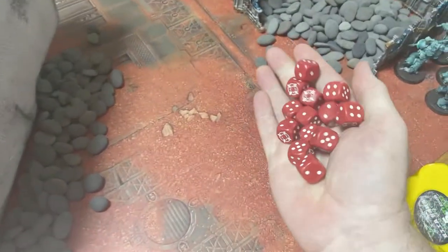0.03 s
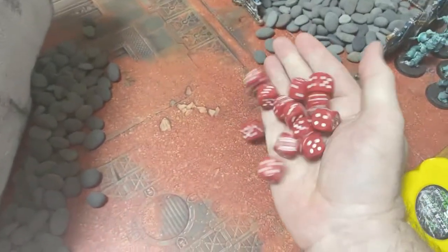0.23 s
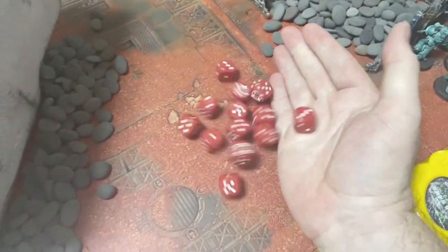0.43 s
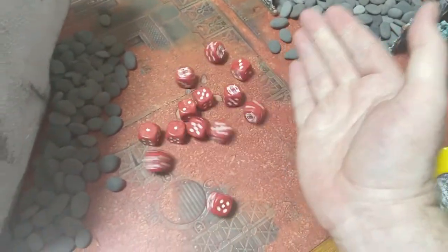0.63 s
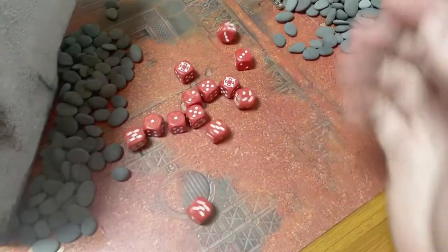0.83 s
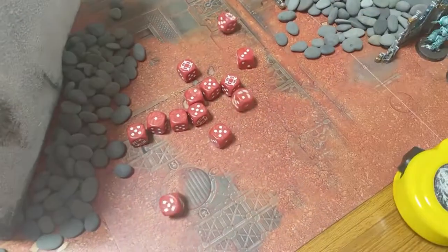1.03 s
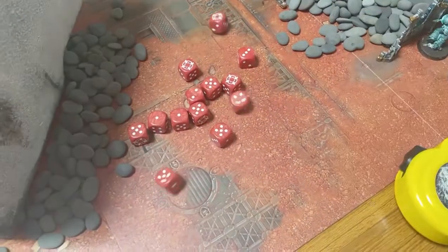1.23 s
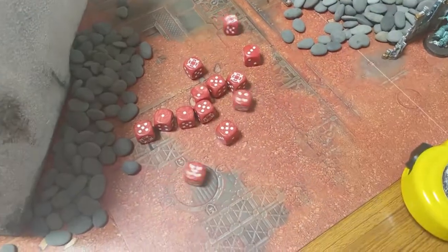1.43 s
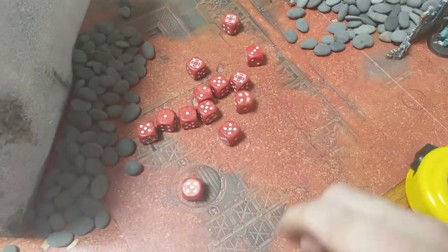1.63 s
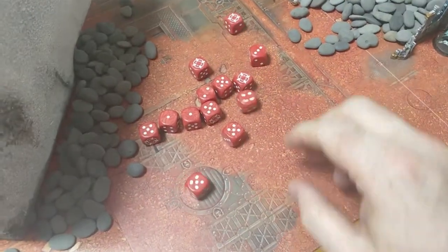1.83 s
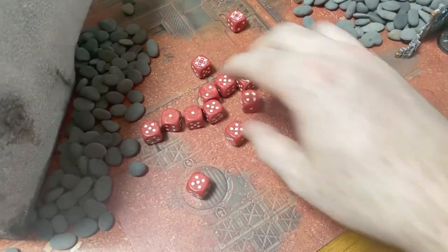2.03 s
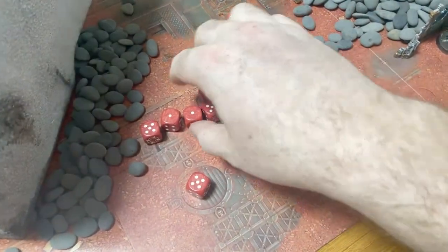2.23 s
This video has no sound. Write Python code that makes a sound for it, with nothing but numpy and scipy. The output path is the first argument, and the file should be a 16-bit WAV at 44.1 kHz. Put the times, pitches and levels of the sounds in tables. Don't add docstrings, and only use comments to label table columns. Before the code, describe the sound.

Dice thrown from a hand crack together and knock a wooden table, thinning quickly to faint clicks, soft taps and finger nudges, over quiet hiss, thin whine and a far cricket in a small room.

```python
import sys
import numpy as np
from scipy import signal
from scipy.fft import rfft, irfft
from scipy.io import wavfile
from scipy.ndimage import uniform_filter1d, minimum_filter1d

SR = 44100
rng = np.random.default_rng(int(sys.argv[2]) if len(sys.argv) > 2 else 0)


def level_to_linear(level):
    exponent = np.asarray(level, float) / 20
    return 10 ** exponent


def file_out(sig):
    cols = np.atleast_2d(sig).T
    lim = np.clip(cols, -1, 1)
    pcm = np.round(lim * 32767).astype(np.int16)
    wavfile.write(sys.argv[1], SR, pcm)


N = 101429
CONTACT_S = 0.0007


def unit(x):
    return x / np.sqrt(np.mean(x ** 2) + 1e-30)


def colour(x, table):
    f = np.maximum(np.fft.rfftfreq(len(x), 1 / SR), 1)
    points = np.array(table, float)
    gain_db = np.interp(np.log(f), np.log(points[:, 0]), points[:, 1], right=-70)
    return irfft(rfft(x) * level_to_linear(gain_db), len(x))


def above(x, hz):
    return signal.sosfilt(signal.butter(3, hz, "high", fs=SR, output="sos"), x)


def fade(t60, rise, size=3000):
    t = np.arange(size) / SR
    return t, (1 - np.exp(-t / rise)) ** 2 * np.exp(-t * np.log(1000) / t60)


def burst(table, t60, rise, hz=None):
    t, envelope = fade(t60, rise)
    if hz:
        table = [(f, db - abs(np.log2(f / hz))) for f, db in table]
    x = colour(rng.standard_normal(len(t)), table) * envelope
    return x / np.abs(x).max()


def hits(rows, db, t60, rise, table, body_db, body_t60):
    out = np.zeros(N + 4000)
    t, envelope = fade(t60, rise)
    for s, peak, hz in rows:
        partner_hz = hz * (0.7955 + 0.362 * rng.random())
        pair = np.sin(2 * np.pi * hz * t) + 0.5 * np.sin(2 * np.pi * partner_hz * t)
        ring = envelope * pair
        x = ring / np.abs(ring).max() + level_to_linear(body_db) * burst(table, body_t60, rise, hz)
        i = int((s + CONTACT_S) * SR)
        out[i:i + len(t)] += level_to_linear(peak + db) * x / np.abs(x).max()
    return out[:N]


def swarm(curve, db, rate, scatter_db, table, t60, rise):
    t, points, out = np.arange(N) / SR, np.array(curve), 0
    for _ in range(6):
        struck = rng.random(N) < rate / 6 / SR
        kicks = struck * level_to_linear(scatter_db * np.minimum(rng.exponential(size=N), 3))
        out = out + signal.fftconvolve(kicks, burst(table, t60, rise))[:N]
    return unit(out) * level_to_linear(np.interp(t, points[:, 0], points[:, 1], left=-120) + db)


# [f/Hz, level/dB]
HISS_COLOUR = [(30, 3), (250, -4.5), (400, -12), (2400, -18), (3700, -22), (4400, -4.5), (5700, -1.5),
               (10500, -34)]


def hiss():
    f, w = 13540, 2400
    bump = [(f - 2 * w, -14), (f - w, -8), (f, 0), (f + w / 2, -7), (f + .62 * w, -60)]
    top = colour(rng.standard_normal(N), bump)
    broad = colour(rng.standard_normal(N), HISS_COLOUR)
    settle = level_to_linear(2.2 * (np.arange(N) / SR < .1))
    return settle * (level_to_linear(-56.5) * unit(broad) + level_to_linear(-66.5) * unit(top))


# [f/Hz, width/Hz, level/dB]
WHINE_LINES = [(4350, 52, -67.5), (5130, 24, -65)]


def whine():
    out = np.zeros(N)
    for hz, w, db in WHINE_LINES:
        line = [(hz - 3 * w, -50), (hz - w, -12), (hz, 0), (hz + w, -12), (hz + 3 * w, -50)]
        out += level_to_linear(db) * unit(colour(rng.standard_normal(N), line))
    return out


def cricket():
    first_s, chirp_s, loudest_s, note_hz = 0.058, 0.0755, 1.15, 5605
    t = np.arange(N) / SR
    k = (t - first_s) / chirp_s + 1
    chirp_size = level_to_linear(2 * rng.standard_normal(64))[np.floor(k + .5).astype(int)]
    swell = level_to_linear(-10 * np.minimum(abs(t - loudest_s), .6))
    throb = np.maximum(np.cos(2 * np.pi * k), 0)
    return level_to_linear(-55.5) * chirp_size * swell * throb * np.sin(2 * np.pi * note_hz * t)


# [t/s, level/dB, f/Hz]
PALM_CLICKS = [
    (0.0928, -30, 4930),
    (0.0997, -10, 7050),
    (0.1084, -23, 4800),
    (0.117, -20.5, 5000),
    (0.1197, -37, 4500),
    (0.129, -22, 4550),
    (0.1457, -17, 5000),
    (0.1591, -19.5, 4600),
    (0.1855, -18.5, 4040),
    (0.2066, -10, 5900),
]
# [t/s, level/dB, f/Hz]
TABLE_CLICKS = [(0.239, -8, 4410), (0.26, -19, 4430), (0.2699, 3, 4400), (0.2855, -14, 6840),
                (0.3159, 1, 4430), (0.3221, -4.5, 6250), (0.34, -22, 5170), (0.351, -13, 5690),
                (0.3602, -9, 4800), (0.402, -8, 4930), (0.411, -7, 4350), (0.4315, -4, 7100),
                (0.4657, -11, 4300), (0.5043, -12.5, 6460), (0.5283, -25, 6700), (0.5511, -8, 6100),
                (0.596, -11, 6600), (0.6095, -19, 6100), (0.6268, -11.5, 5660), (0.6473, -16.5, 5740),
                (0.6692, -17.5, 8400), (0.6851, -16, 8500), (0.6923, -14, 5600), (0.6995, -21, 6100)]
# [t/s, level/dB, f/Hz]
TICKS = [(0.291, -40, 4550), (0.304, -19, 4540), (0.3283, -18, 6400), (0.348, -13, 6800),
         (0.3754, -24, 4200), (0.423, -31, 6540), (0.4514, -31, 4410), (0.4612, -20, 6500),
         (0.4873, -22, 5590), (0.5177, -21, 6600), (0.5353, -24, 6250), (0.5694, -32, 5240),
         (0.6161, -22.5, 6750), (0.715, -30, 5950)]
# [t/s, level/dB, f/Hz]
LATE_CLICKS = [
    (0.8074, -33, 5940),
    (0.829, -25, 4550),
    (0.9173, -26, 5000),
    (1.3134, -26, 4900),
    (1.479, -33.5, 4350),
    (1.5378, -35.5, 5400),
    (1.5926, -33, 5160),
    (1.6842, -35, 4830),
    (1.724, -29, 5270),
    (1.7948, -33.5, 4600),
]
# [t/s, level/dB]
CHATTER = [(.098, -86), (.2, -43.5), (.24, -35.5), (.36, -29.5), (.55, -36.5), (.71, -38.5), (.76, -45),
           (.95, -55.5)]
# [f/Hz, level/dB]
CUPPED = [(1000, -13), (2500, -4.5), (4700, 4), (8500, -6.5), (11000, -22), (14000, -36), (16000, -43)]
# [f/Hz, level/dB]
DIE = [(1200, -6), (2500, -2), (3700, -23.5), (4600, -9), (7000, -13.5), (11000, -26), (13700, -15.5),
       (16000, -45)]
# [f/Hz, level/dB]
BLUR = [(1200, -4), (2500, -1), (3700, -13.5), (4600, -5), (7000, -5.5), (11000, -19), (13700, -20),
        (16000, -32)]


def dice():
    curve = list(CHATTER) + [(1.02, -80)]
    held = np.arange(N) / SR < .215
    palm = hits(PALM_CLICKS, 0.62, t60=0.0045, rise=0.0001, table=CUPPED, body_db=3.2, body_t60=0.0035)
    late = hits(LATE_CLICKS, -2.7, t60=0.0045, rise=0.0002, table=CUPPED, body_db=2.2, body_t60=0.0085)
    clicks = hits(TABLE_CLICKS, -4, t60=0.004, rise=0.0001, table=DIE, body_db=4, body_t60=0.007)
    in_palm = swarm(curve, 0.95, rate=900, scatter_db=2, table=CUPPED, t60=0.015, rise=0.00025)
    on_table = swarm(curve, -1.5, rate=900, scatter_db=2, table=BLUR, t60=0.0076, rise=0.0001)
    ticks = hits(TICKS, 0.98, t60=0.004, rise=0.00015, table=DIE, body_db=5.4, body_t60=0.007)
    return palm + late + clicks + np.where(held, in_palm, on_table) + ticks


# [t/s, level/dB, f/Hz]
THUDS = [(0.22, -2.5, 1450), (0.24, -3, 2060), (0.258, -19, 1320), (0.27, -4.5, 1076), (0.284, -7.5, 1460),
         (0.315, -2.5, 1350), (0.326, -9, 1460), (0.35, 1, 1635), (0.357, -5.5, 2007), (0.377, 0, 1180),
         (0.43, -1.5, 2063), (0.449, -0.5, 1250), (0.462, -0.5, 1365), (0.509, -10, 1700),
         (0.526, -4, 1180), (0.538, -5, 1416), (0.569, -12, 1355), (0.596, -10, 2045), (0.61, -11.5, 1340),
         (0.615, -14, 1160), (0.625, -16, 1510), (0.646, -14.5, 1240), (0.693, -18, 1230),
         (0.714, -19.5, 1220), (0.807, -24.5, 1380), (0.852, -23.5, 1350)]
# [t/s, level/dB, f/Hz]
BOUNCES = [(0.232, -17, 2054), (0.293, -9, 1080), (0.302, -15, 1360), (0.329, -6.5, 1970), (0.34, -8, 1630),
           (0.367, -10, 1450), (0.382, -8.5, 1440), (0.389, -8, 1140), (0.4, -8, 850), (0.411, -7.5, 767),
           (0.42, -10, 2050), (0.443, -11, 1440), (0.475, -7.5, 1460), (0.487, -10, 1100),
           (0.496, -12, 1560), (0.505, -13, 1580), (0.513, -10, 1480), (0.551, -16, 1100),
           (0.559, -18.5, 1420), (0.577, -18, 1500), (0.588, -29, 1490), (0.603, -20, 1340),
           (0.635, -14, 1450), (0.66, -17, 1240), (0.666, -16.5, 1330), (0.684, -15, 1220),
           (0.701, -17, 1205), (0.734, -18.5, 1280), (0.759, -22, 1170), (0.829, -27, 1320)]
# [t/s, level/dB, f/Hz]
TAPS = [(0.882, -29.5, 1240), (0.952, -32, 780), (1.057, -34, 866), (1.157, -37.5, 658), (1.235, -40, 527),
        (1.251, -32, 860), (1.302, -37, 630), (1.335, -30, 950), (1.396, -38, 655), (1.411, -31.5, 700),
        (1.454, -35, 960), (1.48, -28.5, 883), (1.535, -33.5, 770), (1.568, -32, 1450), (1.593, -30.5, 856),
        (1.6, -33.5, 1240), (1.641, -36.5, 939), (1.685, -33, 1067)]
# [t/s, level/dB, f/Hz]
WOBBLE = [(1.097, -42, 825), (1.362, -34.5, 684), (1.625, -32.5, 950), (1.724, -45, 708),
          (1.844, -41.5, 1110), (1.859, -39.5, 1020), (1.909, -38, 617), (1.943, -41, 589),
          (2.024, -39.5, 620), (2.056, -42, 700), (2.097, -42, 696), (2.24, -40, 1530), (2.284, -37, 1460)]
# [t/s, level/dB, f/Hz]
SETTLE = [
    (1.764, -30.5, 1085),
    (1.795, -31.5, 840),
    (1.824, -27, 1870),
    (2.167, -40, 1600),
    (2.204, -36, 1530),
    (2.272, -38.5, 1290),
]
# [t/s, level/dB]
ROLL = [(.222, -28), (.33, -25.5), (.55, -27.5), (.72, -32.5), (.9, -44), (1.0, -50.5), (1.2, -54),
        (1.6, -50), (1.85, -51), (1.97, -53), (2.13, -54), (2.3, -50)]
# [t/s, level/dB]
SCUFF = [(1.2, -63), (1.45, -56.5), (1.6, -49.5), (1.75, -55.5), (1.85, -49.5), (1.95, -63), (2.12, -66),
         (2.2, -61), (2.3, -59)]
# [f/Hz, level/dB]
BOARD = [(40, -56), (110, -19.5), (300, -8.5), (386, -4), (520, -2), (1400, 0.5), (2100, -5), (3500, -28),
         (5500, -54)]
# [f/Hz, level/dB]
PANEL = [(450, -7), (1350, -1.5), (2200, -11.5)]
# [f/Hz, level/dB]
MAT = [(100, -38.5), (250, -13), (650, -1.5), (1000, -5.5), (1550, -11), (1900, -21.5), (3600, -31.5)]
# [f/Hz, level/dB]
GRIT = [(200, -16), (400, -11), (900, -8), (1500, 2), (2300, -7.5), (3400, -34), (5000, -12)]


def table_top():
    t = np.arange(N) / SR
    settled = np.clip((t - .6) / 0.18, 0, 1)
    late = np.clip((t - .88) / 0.088, 0, 1)
    tumble = swarm(ROLL, 1.5, rate=1500, scatter_db=1.5, table=BOARD, t60=0.014, rise=0.0011)
    panel = level_to_linear(2.5) * colour(tumble, PANEL + [(SR / 2, -40)])
    dull = swarm(ROLL, -1.2, rate=1500, scatter_db=1.5, table=MAT, t60=0.018, rise=0.0023)
    roll = (1 - late) * ((1 - settled) * tumble + settled * panel) + late * dull
    thuds = hits(THUDS, 0, t60=0.014, rise=0.00051, table=BOARD, body_db=-1, body_t60=0.028)
    taps = hits(TAPS, -2, t60=0.018, rise=0.0031, table=BOARD, body_db=-2, body_t60=0.016)
    settle = hits(SETTLE, -2, t60=0.012, rise=0.00017, table=BOARD, body_db=2.2, body_t60=0.018)
    bounces = hits(BOUNCES, -4, t60=0.016, rise=0.00085, table=BOARD, body_db=0, body_t60=0.027)
    wobble = hits(WOBBLE, -2.1, t60=0.031, rise=0.00093, table=BOARD, body_db=-1.2, body_t60=0.028)
    scuff = swarm(SCUFF, -1.3, rate=900, scatter_db=2.9, table=GRIT, t60=0.0084, rise=0.0005)
    return above(roll + thuds + taps + settle + bounces + wobble + scuff, 39)


def plank(x):
    b, a = signal.iirpeak(382.4, 19, fs=SR)
    return x + level_to_linear(1) * signal.lfilter(b, a, x)


# [f/Hz, level/dB]
SNAP = [(2000, 7.5), (2900, 5), (3700, -9.5), (6000, -7.5), (10500, -18), (13700, -13), (16000, -19)]


def snaps():
    out = np.zeros(N)
    growth = 1.43
    for s, peak, _ in THUDS:
        x = burst(SNAP, t60=0.011, rise=0.00077)
        i = int((s + CONTACT_S) * SR)
        out[i:i + len(x)] += level_to_linear(-4.5 + growth * peak) * x
    return out


# [t/s, level/dB]
LEAN = [(.6, -51.5), (.8, -54), (.97, -74), (1.65, -72), (1.84, -55), (1.97, -81)]


def rumble():
    frame = [(120, -58.5), (190, 22), (250, 24.5), (330, 8), (600, 0)]
    return swarm(LEAN, 0.87, rate=700, scatter_db=1.5, table=frame, t60=0.096, rise=0.0068)


def room(x, t60, db):
    t = np.arange(SR // 2) / SR
    tail = rng.standard_normal(len(t)) * np.exp(-t * np.log(1000) / t60) * np.clip(t / 0.00043, 0, 1)
    return x + level_to_linear(db) * signal.fftconvolve(x, tail / np.sqrt(np.sum(tail ** 2)))[:N]


def scene():
    wood = room(plank(table_top()) + rumble(), t60=0.35, db=-11)
    bright = room(above(dice() + snaps(), 1360), t60=0.22, db=-11)
    background = hiss() + whine() + cricket()
    return (wood + bright + background)[None]


def roll_off(x):
    return signal.sosfilt(signal.butter(12, 16500, fs=SR, output="sos"), x)


def record(dry):
    dry = signal.sosfilt(signal.butter(2, 45, "high", fs=SR, output="sos"), dry)
    ceiling = 0.62
    need = np.minimum(1, ceiling / (np.abs(dry) + 1e-9))
    gain = uniform_filter1d(minimum_filter1d(need, size=129), size=65)
    return roll_off(dry * gain)


dry = scene()
out = record(dry)
file_out(out)
```